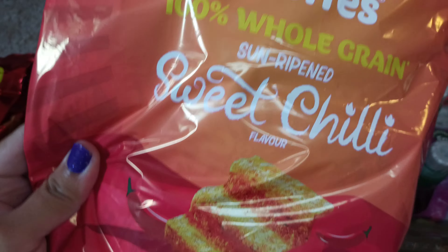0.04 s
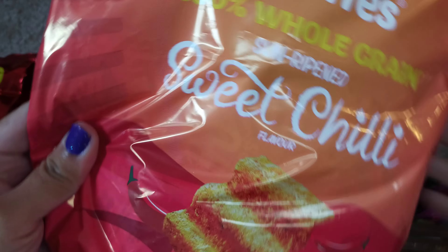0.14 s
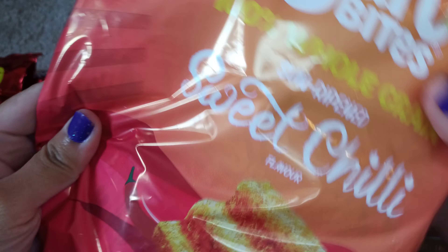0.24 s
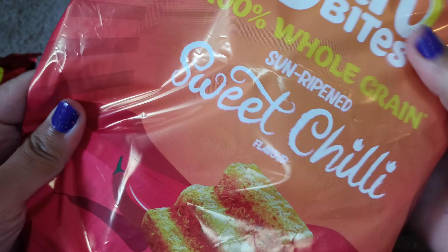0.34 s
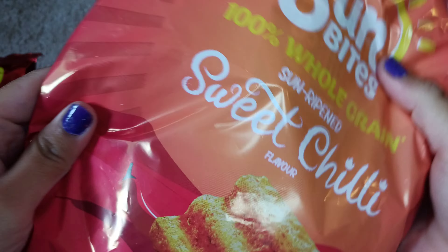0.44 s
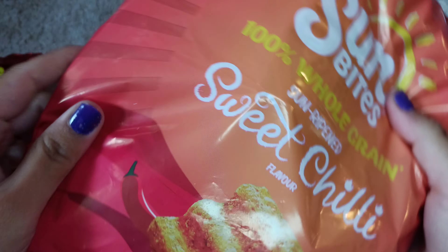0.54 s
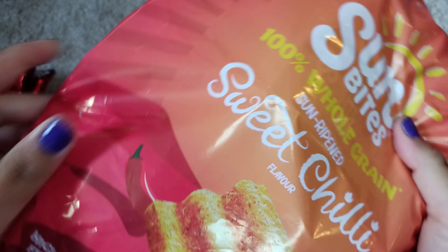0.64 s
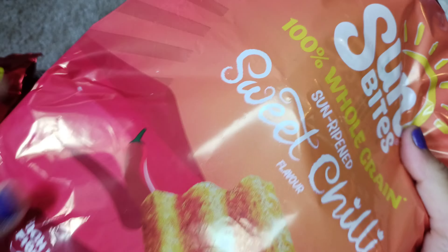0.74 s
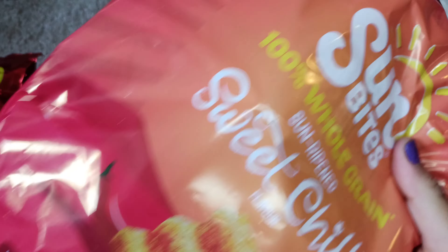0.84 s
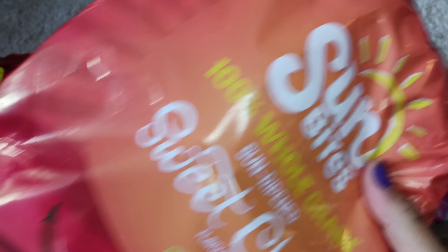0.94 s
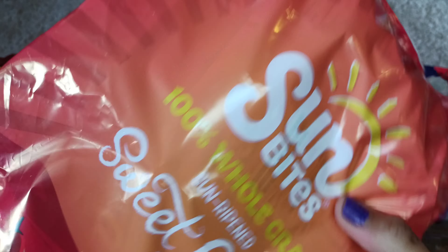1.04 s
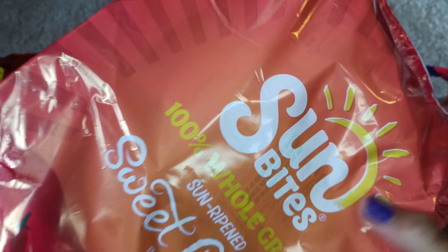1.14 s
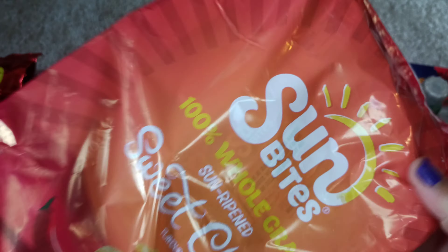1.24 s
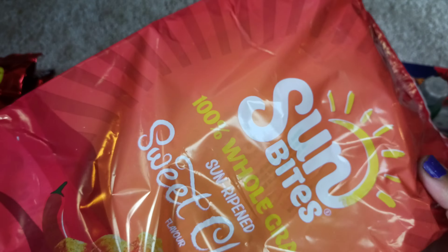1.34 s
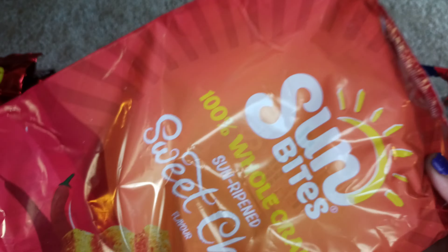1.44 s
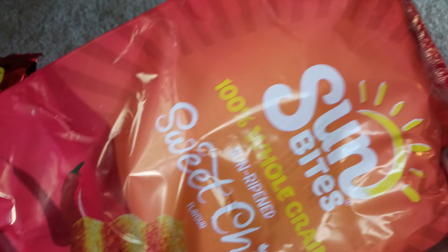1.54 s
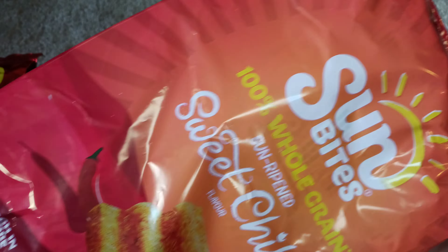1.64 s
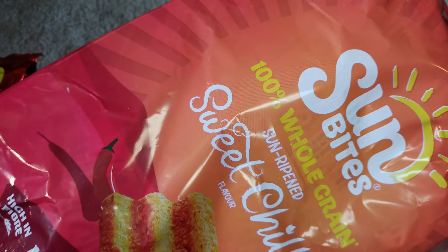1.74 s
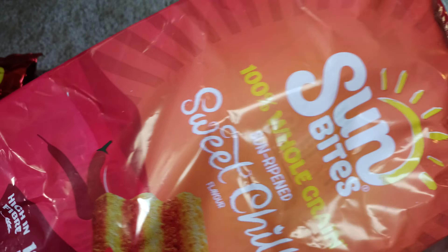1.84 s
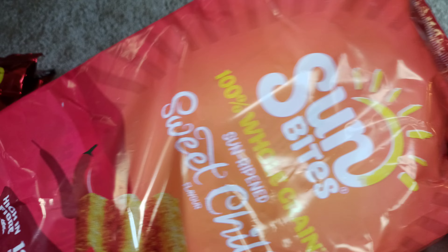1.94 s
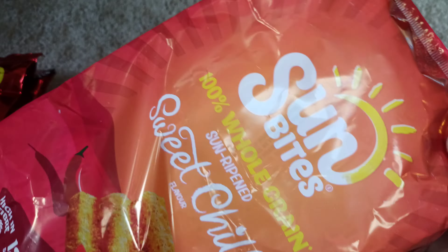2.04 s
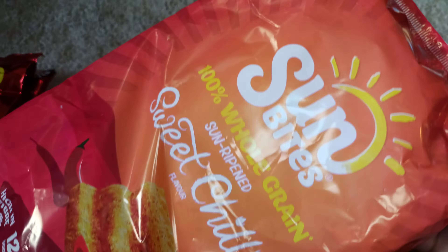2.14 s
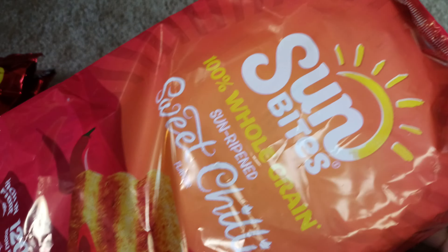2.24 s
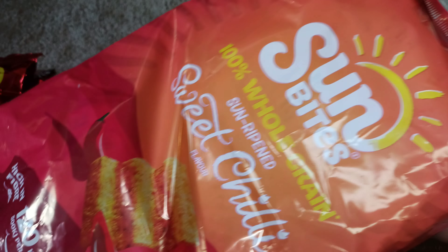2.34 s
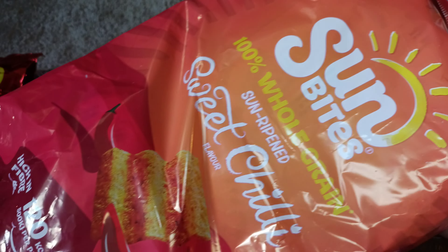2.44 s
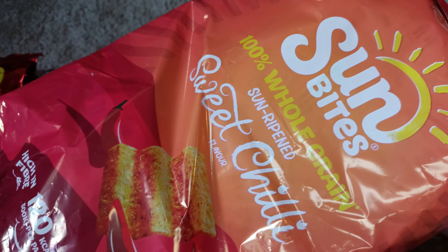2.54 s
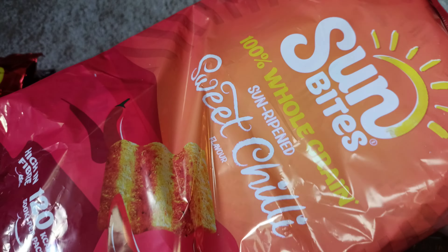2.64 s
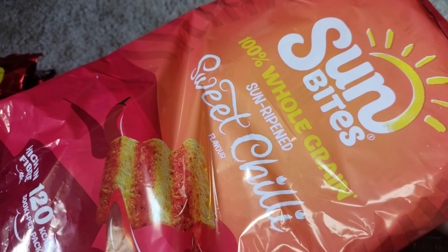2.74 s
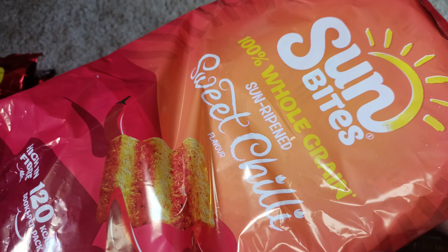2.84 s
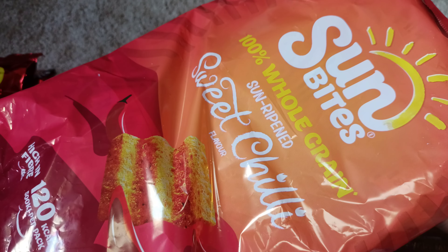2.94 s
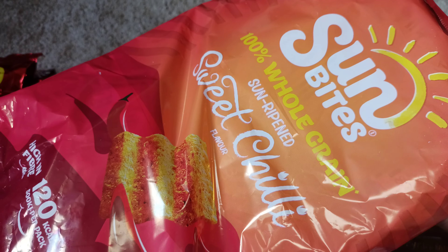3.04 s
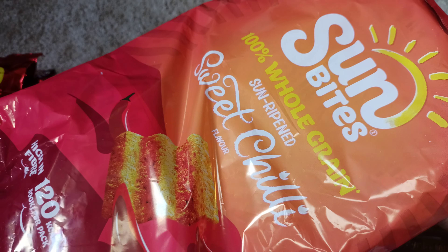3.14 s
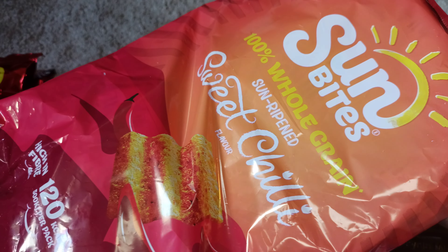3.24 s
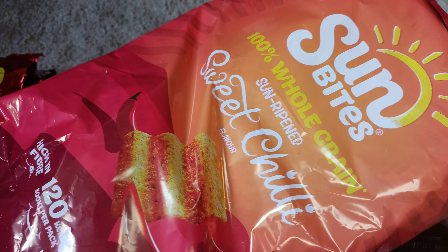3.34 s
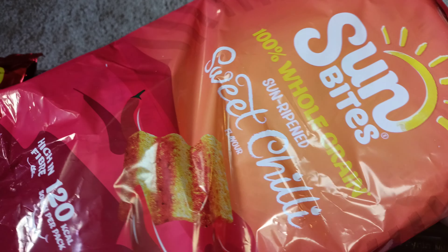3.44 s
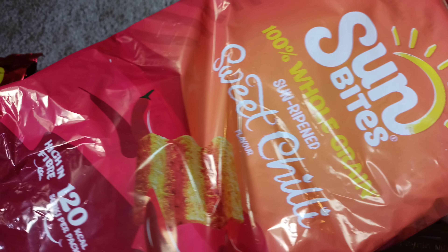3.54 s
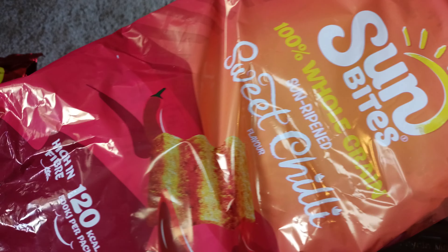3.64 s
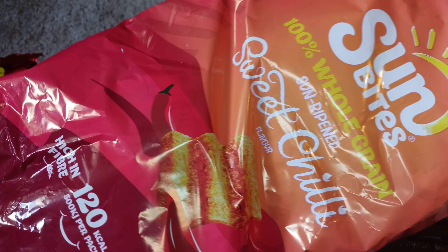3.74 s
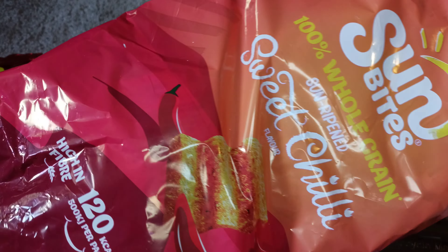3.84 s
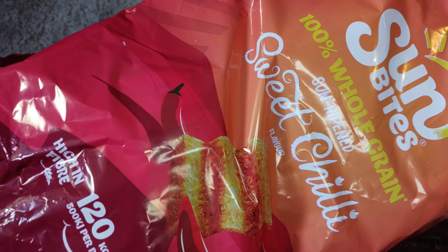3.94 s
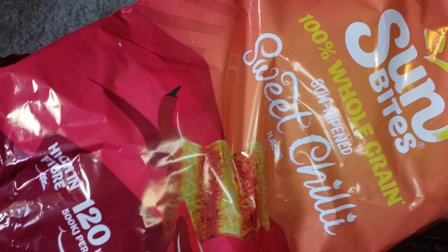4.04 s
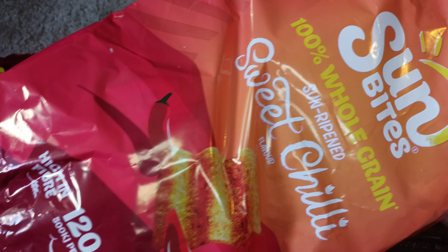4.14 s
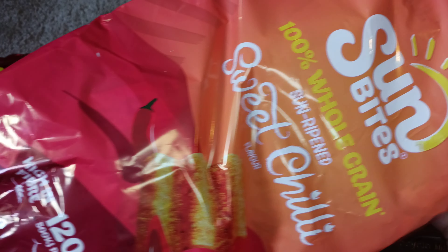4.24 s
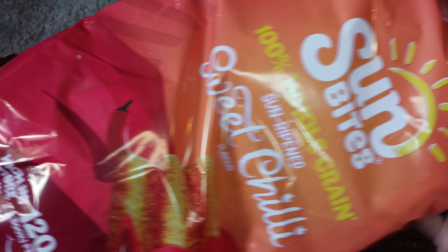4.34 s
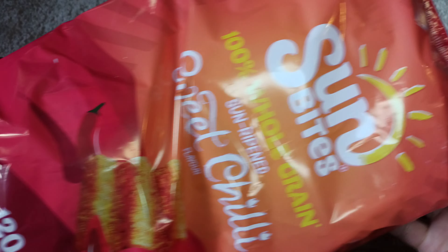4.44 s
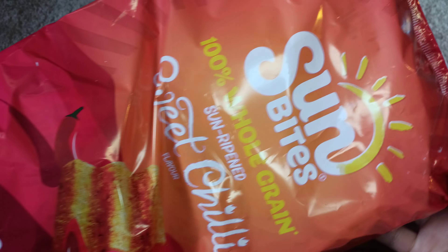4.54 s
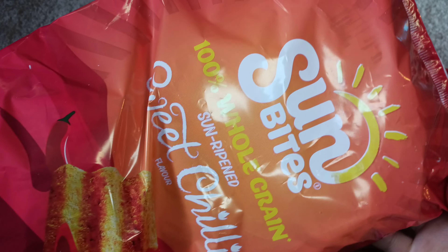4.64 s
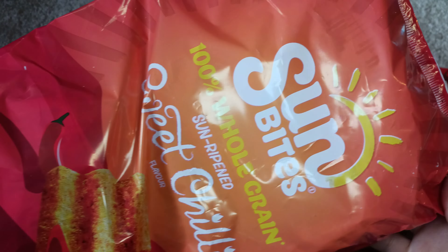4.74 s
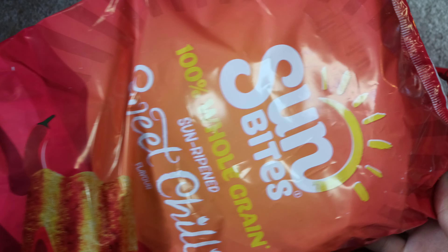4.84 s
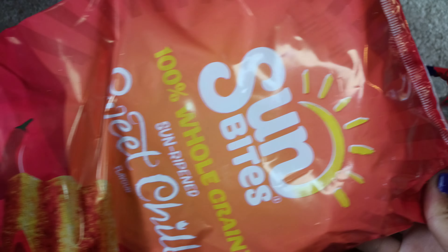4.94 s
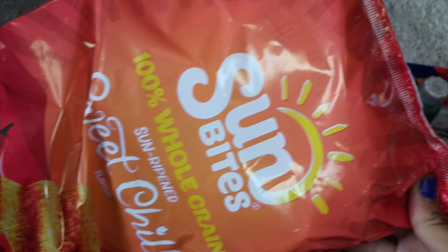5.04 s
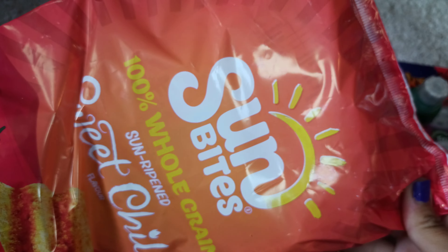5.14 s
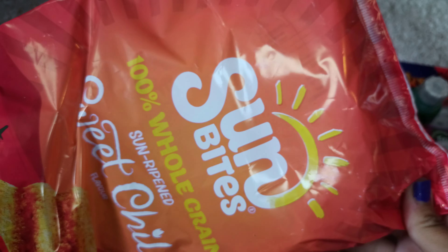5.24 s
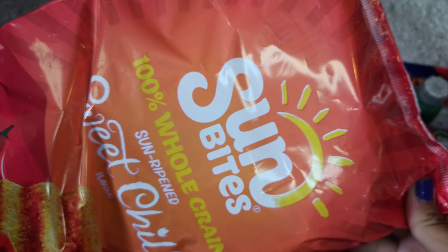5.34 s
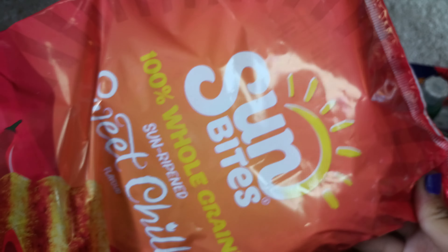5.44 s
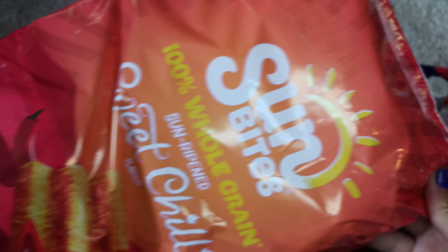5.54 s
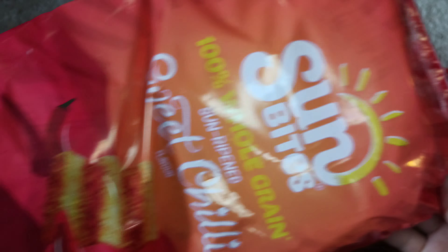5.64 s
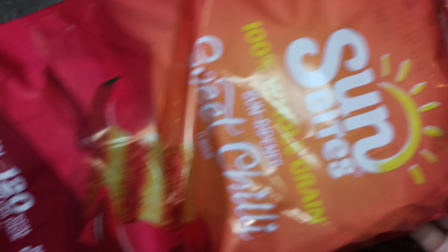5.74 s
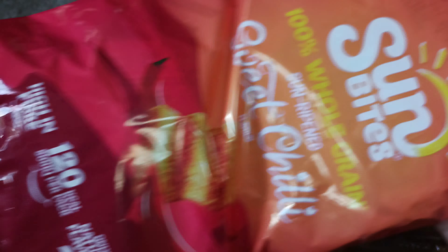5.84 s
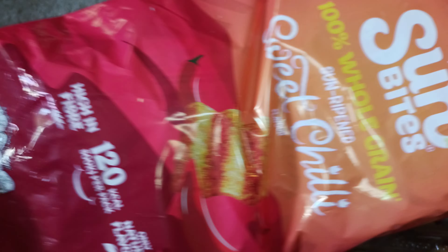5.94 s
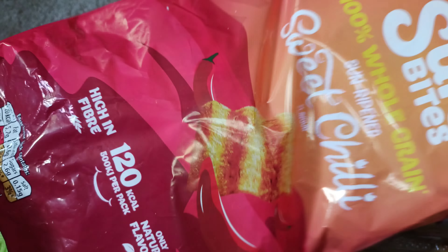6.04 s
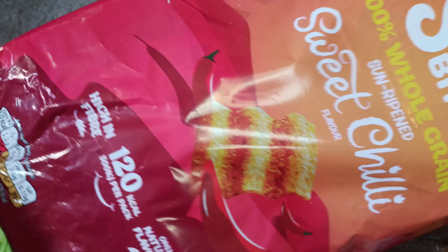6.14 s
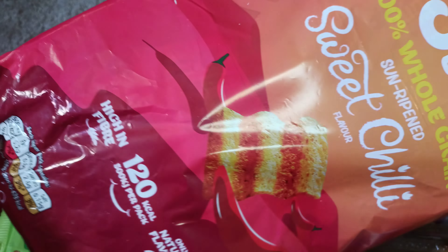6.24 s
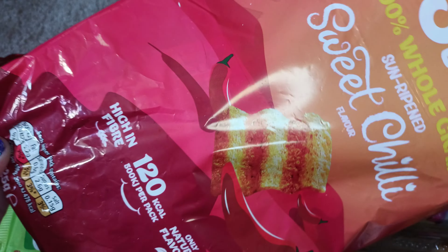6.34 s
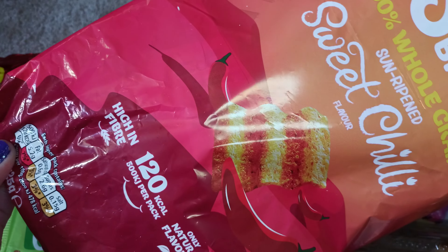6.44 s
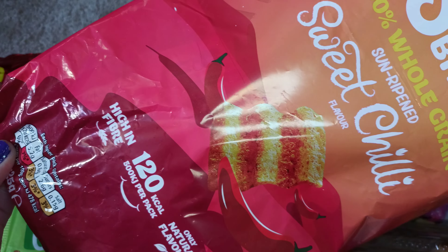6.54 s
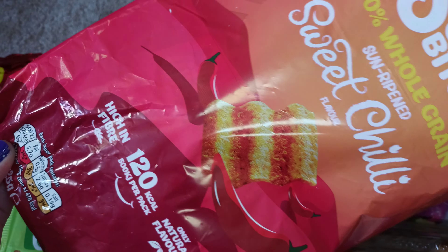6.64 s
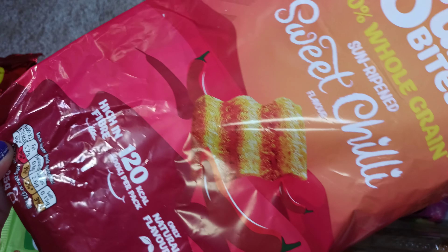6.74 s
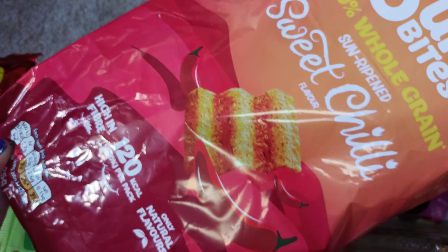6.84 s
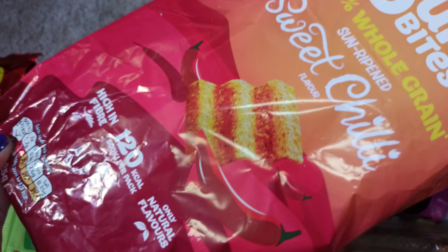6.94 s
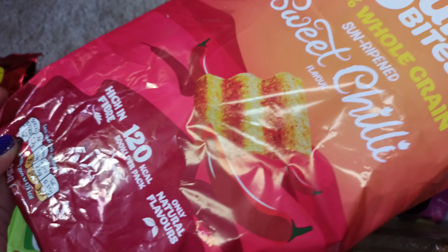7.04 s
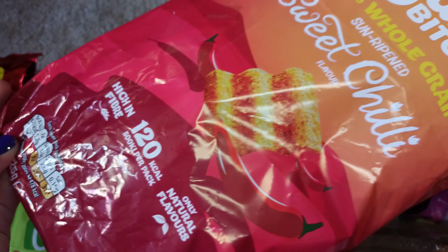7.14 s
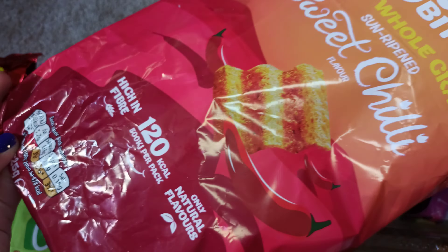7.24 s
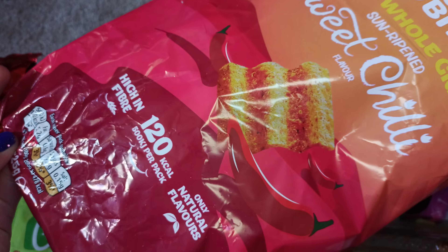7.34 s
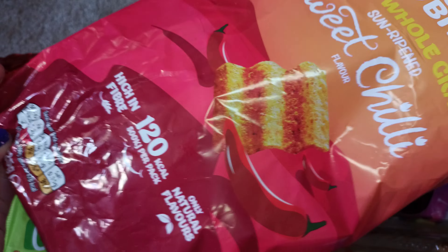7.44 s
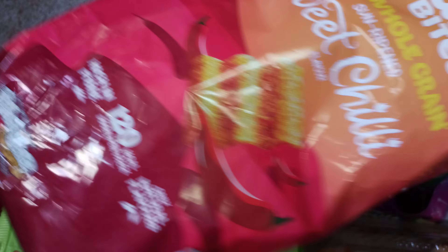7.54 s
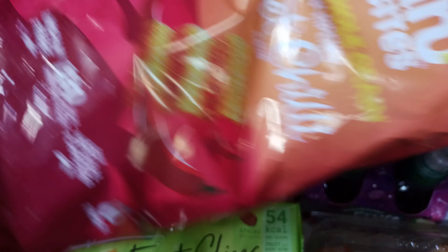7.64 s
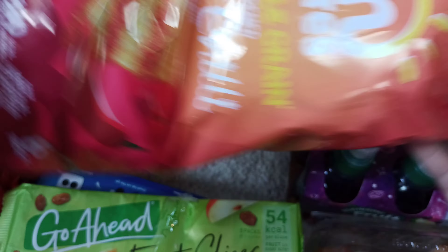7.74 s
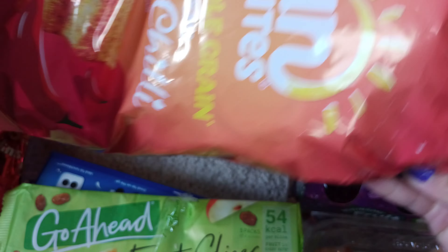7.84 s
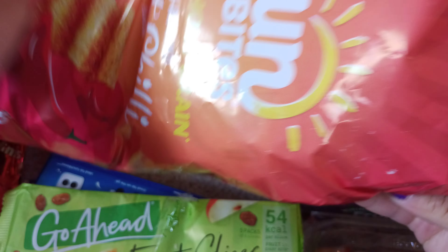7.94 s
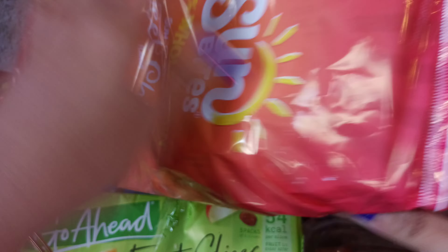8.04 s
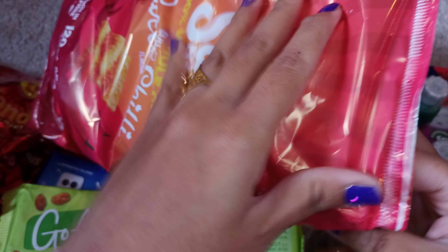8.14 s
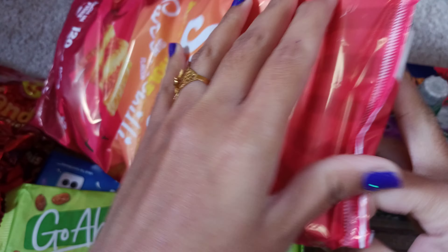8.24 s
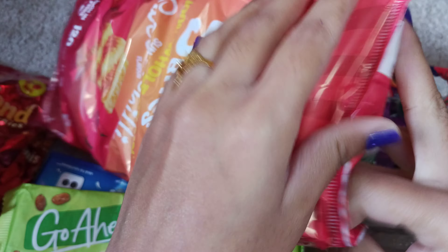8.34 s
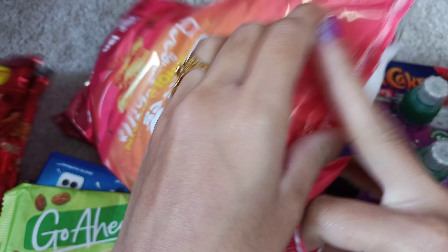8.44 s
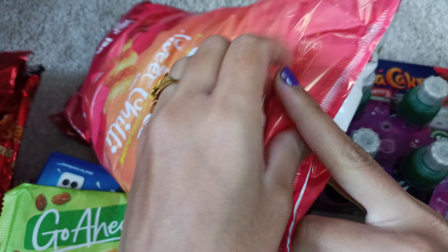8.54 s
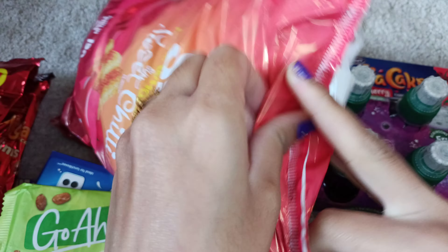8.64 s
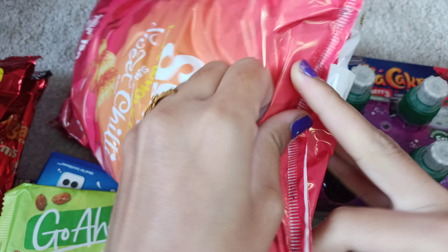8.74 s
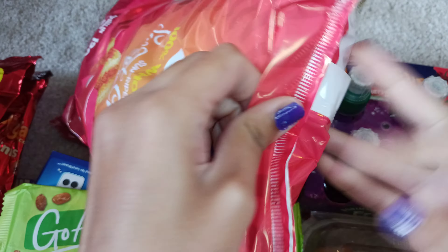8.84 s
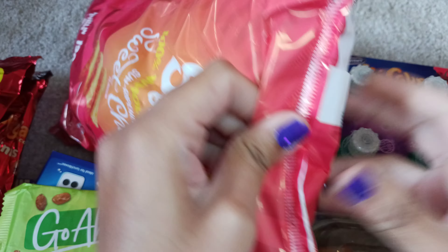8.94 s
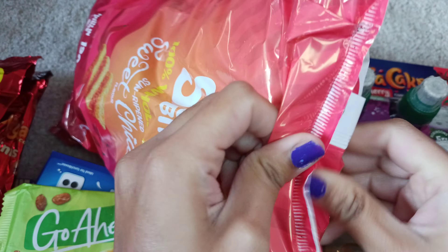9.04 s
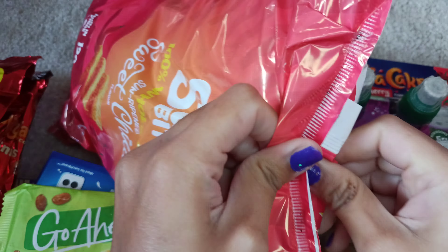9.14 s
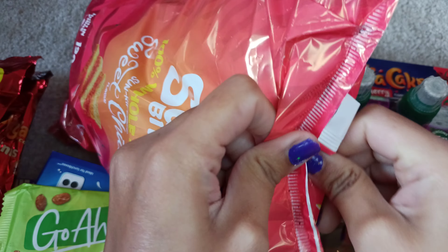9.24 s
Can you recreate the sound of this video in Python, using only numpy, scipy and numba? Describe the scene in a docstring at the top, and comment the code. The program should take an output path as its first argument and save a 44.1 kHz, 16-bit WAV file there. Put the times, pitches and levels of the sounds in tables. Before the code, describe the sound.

Hands turn a large plastic snack bag close to the microphone in a quiet room. A thumb slips over the taut plastic in a quick run of tugs, then the bag crinkles unevenly, with sharp snaps and a soft, low rustle from the air inside. The handling almost stops about three seconds in, then resumes. Near the end the crinkling grows denser and louder as the bag is gripped.

```python
"""A thumb slips in short tugs over a taut plastic snack bag, while tiny creases begin to crackle.
Hands turn, press and grip the large bag close to a microphone in a quiet carpeted room. Bigger creases
snap over one by one, quick crumples burst out, and the air inside rustles low as it is squeezed.
Now and then a dent pops out with a hollow note, a faint hum comes and goes, and a fingertip drags once."""
import sys
import numpy as np
from scipy import signal
from scipy.fft import rfft, irfft
from scipy.io import wavfile
from scipy.ndimage import uniform_filter1d
from numba import njit

SR = 44100
rng = np.random.default_rng(int(sys.argv[2]) if len(sys.argv) > 2 else 0)


def unload_audio(sound):
    """Save the sound as a 16-bit wav file, at the path given as the first command line argument."""
    columns = np.transpose(np.atleast_2d(sound))
    # keep every value between -1 and 1, then stretch to whole-number steps
    steps = np.round(np.clip(columns, -1, 1) * 32767)
    wavfile.write(sys.argv[1], SR, steps.astype(np.int16))


N = 409688

# tone of the quiet room: f/Hz, level/dB
ROOM_TONE = [(24, -34), (40, 12), (186, -4.5), (324, -15), (1010, -34), (3050, -24.5), (3460, -27),
             (16500, -51)]
# tone of the plastic film and microphone together: f/Hz, level/dB
FILM_TONE = [(90, -25), (150, -17), (500, -15.5), (770, -8), (1160, -8.5), (2400, -6), (3900, -3.5),
             (6500, -6.5), (7950, -0.5), (10500, -13), (13000, -10.5), (15500, 1.5), (16100, -28),
             (17000, -46)]
# how busily the hands work the film: t/s, crackle level/dB
HAND_EFFORT = [(0, -56.5), (.31, -45.5), (.55, -34.5), (.9, -43.5), (1.25, -34.5), (1.55, -35),
               (1.9, -45.5), (2.15, -45.5), (2.55, -42), (2.66, -58), (2.85, -45.5), (2.93, -74.5),
               (3.08, -81), (3.16, -95), (3.42, -77), (3.55, -47), (3.74, -35), (4.08, -45), (4.33, -44.5),
               (4.6, -41.5), (4.95, -43.5), (5.18, -35), (5.35, -52), (5.62, -42.5), (5.86, -35),
               (6.45, -40), (6.6, -69.5), (6.76, -48), (7.1, -41), (7.6, -46), (7.7, -29.5), (8.7, -29.5),
               (8.82, -35.5), (9.08, -35.5), (9.29, -30.5)]
# quick crumples that also shove the air inside: t/s, length/s, crackle level/dB, rustle level/dB
CRUMPLES = [(0.343, 0.00667, -24, -29), (0.408, 0.11, -29.5, -30.5), (0.592, 0.11, -33, -38.5),
            (0.775, 0.082, -33.5, -39), (0.976, 0.19, -26, -36), (1.27, 0.078, -31, -38.5),
            (1.442, 0.066, -33, -51), (1.61, 0.11, -36.5, -46.5), (1.964, 0.12, -33, -40),
            (2.355, 0.02336, -40, -47.5), (3.258, 0.04799, -56, -56.5), (4.17, .06, -38.5, -68),
            (4.445, 0.093, -38, -40.5), (4.623, 0.027, -35.5, -58), (5.19, 0.024, -38, -43.5),
            (5.674, 0.017, -38, -45), (6.14, 0.071, -24, -35), (7.068, 0.07193, -42, -42),
            (8.042, 0.12, -31, -36), (8.32, 0.29, -33.5, -40), (8.872, 0.053, -25, -37)]
# resonances of the squeezed bag: f/Hz, width/Hz, level/dB
BAG_MODES = [(180, 270, -0.5), (329, 150, -3.5), (654, 1000, -6.5)]
# thumb slips on the taut film: t/s, level/dB
THUMB_SLIPS = [(0.1206, -14.5), (0.1675, -13), (0.2036, -14), (0.231, -17), (0.2562, -14), (0.2843, -12.5),
               (0.3052, -13.5), (0.3843, -12.5), (0.4146, -15), (0.4423, -17)]
# ringing of the air and film under the thumb: f/Hz, level/dB, time to fade by 60 dB/s
CUSHION_MODES = [(357, -0.5, 0.017224), (656, -3, 0.015), (1340, -13.5, 0.012)]
# single creases snapping over: t/s, middle level/dB, treble level/dB
SNAPS = [(0.351, -6.5, -8), (0.455, -19, -27.0), (0.464, -16.0, -21.0), (0.4906, -14.0, -14.5),
         (0.5, -23, -20), (0.583, -18.5, -17), (0.6542, -36, -13), (0.7406, -9.5, -18.0),
         (0.9472, -18, -23.0), (1.0884, -19, -24), (1.1957, -19, -10.5), (1.4362, -23, -19.0),
         (1.4425, -16, -18), (1.4689, -21, -14.5), (1.57, -19, -20.0), (1.6158, -17.5, -17),
         (1.6372, -13, -14), (1.658, -23, -13.5), (1.9455, -19.5, -28.0), (2.053, -18, -17.0),
         (2.0737, -20, -10.0), (2.1058, -18, -24.0), (2.1189, -19, -21.0), (2.1697, -15.5, -45),
         (2.2482, -19.5, -26), (2.339, -27, -28), (2.36, -21.5, -23), (2.3855, -23.0, -31.0),
         (2.51, -21, -17.5), (2.558, -20.5, -14.0), (2.7337, -21.5, -15), (2.8495, -21, -23.0),
         (2.955, -53, -66.0), (3.026, -56.5, -63.0), (3.079, -54, -73.5), (3.0941, -58.5, -76.0),
         (3.195, -52, -71), (3.2354, -42, -48), (3.2762, -39, -38), (3.3025, -27, -27), (3.418, -40, -54.5),
         (3.4743, -39, -43), (3.529, -30, -31.0), (3.5483, -35, -35), (3.5885, -24.5, -19.5),
         (3.6103, -20, -19), (3.6451, -21, -22), (3.6665, -17, -17.5), (3.7032, -17, -14),
         (3.7232, -17.5, -14.0), (3.7481, -18.0, -26.0), (3.7844, -11.5, -14), (3.7997, -29.5, -20),
         (3.8526, -25.5, -19), (3.877, -23, -33), (3.9335, -21.5, -9.5), (3.969, -23, -7.5),
         (4.0327, -18.5, -16), (4.1571, -21, -21), (4.186, -18.5, -29), (4.227, -23, -18),
         (4.267, -20, -12.5), (4.2956, -30, -25), (4.343, -44, -28), (4.3508, -27, -28), (4.3644, -23, -25),
         (4.3726, -24, -27.0), (4.4567, -20.5, -32.0), (4.5363, -19.5, -19), (4.5949, -20, -17),
         (4.6021, -16, -13.5), (4.685, -20, -24), (4.7204, -11.5, -14), (4.7289, -19, -13.5),
         (4.7939, -26, -29.5), (4.8272, -24.5, -23), (4.852, -28, -21), (4.8653, -25, -29),
         (4.9393, -23.5, -25), (4.9528, -9.5, -13.5), (4.9912, -22, -35.0), (5.0546, -28, -38.5),
         (5.079, -14, -12), (5.204, -12.5, -20.0), (5.2237, -17, -13), (5.2763, -18.5, -18.5),
         (5.3479, -17.5, -15.5), (5.4213, -28.0, -30.0), (5.4637, -20.5, -25), (5.4748, -27.0, -34),
         (5.5249, -17.5, -14), (5.5445, -25, -11), (5.5621, -23.5, -20.5), (5.6768, -18, -15),
         (5.741, -19.5, -29), (5.796, -19.5, -21), (5.8314, -18.5, -20), (5.8523, -14.5, -16),
         (5.8693, -14, -14), (5.9981, -15, -10), (6.0291, -19, -27.0), (6.227, -21.5, -11.5),
         (6.2642, -20, -22), (6.293, -26.0, -17.0), (6.326, -16, -16), (6.4135, -24.0, -37),
         (6.452, -27, -26), (6.4625, -23.5, -19), (6.6405, -40, -51.0), (6.656, -55, -38.5),
         (6.7276, -31.0, -27), (6.9133, -26.5, -29), (6.952, -17.5, -15.0), (7.0674, -11.5, -17),
         (7.1762, -21.0, -18), (7.2117, -17.0, -23.5), (7.2955, -20.5, -32), (7.3343, -21.0, -21),
         (7.3473, -28.5, -20.5), (7.3752, -18.5, -25.0), (7.4564, -20.0, -19.0), (7.4774, -38.5, -23.0),
         (7.4875, -19.5, -26.0), (7.5435, -22, -30.0), (7.5601, -26, -35.0), (7.6594, -12.5, -10.5),
         (7.703, -25, -17.0), (7.7817, -18, -10.5), (7.9187, -18.0, -10.5), (8.0791, -16, -5),
         (8.141, -14, -29), (8.1684, -16.0, -19.5), (8.2338, -12, -23.5), (8.3363, -14.5, -14.0),
         (8.3621, -13.5, -17.0), (8.4183, -10.5, -12), (8.449, -14, -11), (8.6051, -13.5, -13.5),
         (8.6453, -19, -11.5), (8.6682, -21, -8), (8.8477, -11.5, -15), (8.9101, -11, -8),
         (8.988, -21.5, -12.5), (9.1017, -14.5, -16.0), (9.1219, -14, -11), (9.1613, -15, -19.0),
         (9.1852, -15.5, -17), (9.216, -11, -12)]
# dents popping out: t/s, level/dB, f/Hz
DENTS = [(1.3112, -13.5, 860), (2.2482, -32, 258), (5.869, -19, 543.8), (6.365, -25.5, 609.6),
         (7.0677, -13, 1270)]
# spells of faint low hum: start t/s, end t/s, f/Hz, level/dB
HUM_SPELLS = [(2.3, 2.85, 58, -66), (3.5, 3.9, 58, -65), (4.8, 5.85, 84, -63)]
# a fingertip sticks and slips, faster and then slower: t/s, slip rate/Hz, level/dB
FINGER_DRAG = [(2.62, 69.67, -43.5), (2.69, 78, -36.5), (2.719, 260, -35), (2.759, 520, -33),
               (2.841, 500, -34), (2.859, 180, -31.5), (2.899, 100, -49)]
# resonances of the film under the fingertip: f/Hz, width/Hz, level/dB
FINGER_MODES = [(530, 220, -2.5), (1630, 550, 0.5), (2429, 210, -6.5), (4450, 1046, -13)]


def from_db(db):
    """Turn decibels into a factor to multiply a sound by."""
    return 10 ** (np.asarray(db) / 20)


def set_level(x, db):
    """Scale a sound to an average (RMS) level."""
    return x * from_db(db) / np.sqrt(np.mean(x ** 2))


def colour(x, tone):
    """Filter a sound so that its tone follows a table of f/Hz, level/dB."""
    hz, db = np.transpose(tone)
    log_gain = np.interp(np.log(np.linspace(1, SR / 2, 4097)), np.log(hz), db) * np.log(10) / 20
    # fold the cepstrum so that the filter never rings before a click
    cepstrum = irfft(log_gain)
    cepstrum[1:4096] *= 2
    cepstrum[4097:] = 0
    response = irfft(np.exp(rfft(cepstrum)))[:4096]
    return signal.fftconvolve(x, response)[:N]


def wobble(per_second):
    """A curve that glides between random values, with a spread of 1."""
    step = max(int(SR / per_second), 2)
    curve = uniform_filter1d(rng.standard_normal(N // 20)[np.arange(N) // step], step)
    return curve / curve.std()


def resonate(x, modes):
    """Send a sound through several resonances and add them up."""
    return sum(from_db(db) * signal.lfilter(*signal.iirpeak(hz, hz / width, SR), x)
               for hz, width, db in modes)


@njit
def ring(start, hz, t60, size, phase, softness):
    """Tones that swell quickly (slower with more softness), then fade by 60 dB in t60 seconds."""
    out = np.zeros(N)
    for k in range(len(hz)):
        step = np.exp(2j * np.pi * hz[k] / SR - np.log(1000) / (t60[k] * SR))
        tone, held_back = size[k] * np.exp(1j * phase[k]), 1.
        for i in range(start[k], min(N, start[k] + int(.75 * t60[k] * SR))):
            held_back *= softness
            out[i] += tone.imag * (1 - held_back)
            tone *= step
    return out


def room_noise():
    """The room's steady background: soft noise, mostly bass."""
    return set_level(colour(rng.standard_normal(N), ROOM_TONE), -69)


def handling(t):
    """Crackle follows the hands and rustle follows the crackle; crumples rise, hold and fall on top."""
    rise_db_per_s, fall_db_per_s = 598, 303
    crackle_db = np.interp(t, *np.transpose(HAND_EFFORT))
    rustle_db = -48 + 0.51 * (crackle_db + 40)
    power = from_db(2 * np.array([crackle_db, rustle_db]))
    for start, length, *db in CRUMPLES:
        drop_db = np.maximum(rise_db_per_s * (start - t), fall_db_per_s * (t - start - length)).clip(0)
        power += from_db(2 * (np.array(db)[:, None] - drop_db))
    return 10 * np.log10(power)


def creases(times, level_db, treble_db, body_db, tones, t60, spread_ms, phase_spread):
    """Each crease rings its own patch of film with many tones; the low ones ring longer."""
    low_hz, high_hz, scatter_db, rise_s = 200, 16800, 7, 47e-6
    chance = rng.random((len(times), tones, 5))
    place = (np.arange(tones) + chance[..., 0]) / tones
    hz = low_hz + (high_hz - low_hz) * place ** 2
    in_body = np.clip((4500 - hz) / 2500, 0, 1)
    in_treble = np.clip((hz - 9000) / 3000, 0, 1)
    db = level_db[:, None] + in_body * body_db[:, None] + in_treble * treble_db[:, None]
    # high tones lie further apart, so each carries more
    size = from_db(db + scatter_db * (2 * chance[..., 1] - 1)) * np.sqrt(place / tones)
    decay = t60 * (hz / 8000) ** -.4 * (0.92 + chance[..., 2])
    # most tones start together as one click; the crease runs on and sets off the rest late
    start = (SR * (times[:, None] + spread_ms / 1000 * chance[..., 3] ** 4)).astype(np.int64)
    phase = 2 * np.pi * (rng.random((len(times), 1)) + phase_spread * chance[..., 4])
    columns = (np.ravel(a) for a in (start, hz, decay, size, phase))
    return colour(ring(*columns, softness=np.exp(-1 / (rise_s * SR))), FILM_TONE)


def crackle(t, crackle_db):
    """Small creases tick, each duller or brighter; some stand out more when the hands are gentle."""
    chance = rng.random((3200, 4))
    at = (chance[:, 0] * N).astype(int)
    gentle = np.clip((-25.5 - crackle_db[at]) / 30, 0, 1)
    size_db = np.minimum(-(5.33 + 3.9 * gentle) * np.log(chance[:, 1]), 12 + 7 * gentle)
    flurry_db = 2.44 * wobble(40)[at]
    treble_db, body_db = 8 * (2 * chance[:, 2:].T - 1)
    return from_db(10.5) * creases(t[at], crackle_db[at] + size_db + flurry_db, treble_db, body_db - 4,
                                   tones=20, t60=0.004, spread_ms=.6, phase_spread=0.44396)


def swish(crackle_db):
    """Film slides over film and skin: countless tiny creases blur into a flickering hiss."""
    hiss = rng.standard_normal(N) * from_db(1.21 * wobble(35) + 2.63 * wobble(400))
    return set_level(colour(hiss, FILM_TONE), -3) * from_db(crackle_db)


def rustle(rustle_db):
    """Soft pushes on the bag shake the cushion of air inside."""
    when, strength = rng.random((2500, 2)).T
    pushes = 0.092 * rng.standard_normal(N)
    np.add.at(pushes, (when * N).astype(int), from_db(np.minimum(-3.5 * np.log(strength), 12)))
    pushes = signal.lfilter(*signal.butter(3, [100, 1300], "band", fs=SR), pushes)  # skin is soft
    flicker = from_db(2.2 * wobble(25))
    return set_level(resonate(pushes, BAG_MODES) * flicker, 0.42) * from_db(rustle_db)


def thumb_slips():
    """Every slip is one sharp tug that rings the air and film under the thumb."""
    times, db = np.transpose(THUMB_SLIPS)
    hz, mode_db, t60 = np.transpose(CUSHION_MODES)
    pitches = hz * (1 + 0.025 * rng.standard_normal((len(times), len(hz))))
    start = np.repeat((times * SR).astype(np.int64), len(hz))
    size = from_db(db[:, None] + mode_db).ravel()
    phase = np.full(len(size), 1.9)
    return ring(start, pitches.ravel(), np.tile(t60, len(times)), size, phase, softness=0.6401)


def snaps():
    """Single creases snap over; each thumb slip tips a small one too."""
    times, db, treble_db = np.transpose(SNAPS)
    # soft snaps get more body (low tones) for their size
    body_db = -8 + 0.47 * (-20 - db).clip(0) + 4.5 * rng.standard_normal(len(times))
    brightness_db = treble_db - db + 4
    slip_times, slip_db = np.transpose(THUMB_SLIPS)
    even = np.zeros(len(slip_times))
    return from_db(14.5) * creases(np.r_[times, slip_times], np.r_[db, slip_db - 12],
                                   np.r_[brightness_db, even], np.r_[body_db, even],
                                   tones=56, t60=0.0041, spread_ms=.7, phase_spread=0.23)


def dent_pops(cycles=13):
    """A dent pops out and a pocket of air rings for a few cycles."""
    times, db, hz = np.transpose(DENTS)
    start = (times * SR).astype(np.int64)
    return ring(start, hz, cycles / hz, from_db(db), np.zeros(len(times)), softness=0.77)


def hum(t):
    """A faint low tone swells, wavers and fades, once for each spell."""
    drift_cycles = 3.96 * np.cumsum(wobble(8.1)) / SR
    out = np.zeros(N)
    for start, end, hz, db in HUM_SPELLS:
        swell = np.sin(np.pi * np.clip((t - start) / (end - start), 0, 1)) ** .5
        out += from_db(db + 8.76 * wobble(14)) * swell * np.sin(2 * np.pi * (hz * t + drift_cycles))
    return out


def finger_drag(t):
    """A fingertip sticks and slips, and its uneven tugs ring the film."""
    times, rates, db = np.transpose(FINGER_DRAG)
    rate = np.interp(t, times, rates)
    slips_so_far = np.floor(np.cumsum(rate * (1 + .1 * wobble(200)) / SR))
    tugs = np.diff(slips_so_far, prepend=0) * from_db(3.6 * rng.standard_normal(N)) / np.sqrt(rate / SR)
    return resonate(tugs, FINGER_MODES) * from_db(np.interp(t, times, db, -200, -200))


def add_echo(x, t60=0.3, echo_db=-23):
    """Carpet and furniture leave only a short, soft echo."""
    t = np.arange(SR // 3) / SR
    tail = rng.standard_normal(len(t)) * from_db(-60 * t / t60) * (t > .003)
    tail = signal.lfilter(*signal.butter(1, 6000, fs=SR), tail)
    return x + from_db(echo_db) * signal.fftconvolve(x, tail / np.sqrt(np.sum(tail ** 2)))[:N]


def scene():
    """The bag and the room, mixed into one channel."""
    t = np.arange(N) / SR
    crackle_db, rustle_db = handling(t)
    bag = snaps() + crackle(t, crackle_db) + swish(crackle_db) + rustle(rustle_db)
    bag += thumb_slips() + dent_pops() + finger_drag(t)
    return (add_echo(bag) + hum(t) + room_noise())[None]


def record(dry):
    """The microphone loses the deep bass; the recorder clips rare overloads and cuts the top treble."""
    thin = signal.sosfilt(signal.butter(3, 62, "high", fs=SR, output="sos"), dry)
    clipped = np.clip(thin, -.95, .95)
    return signal.sosfilt(signal.ellip(8, .2, 60, 16700, fs=SR, output="sos"), clipped)


dry = scene()
out = record(dry)
unload_audio(out)
```